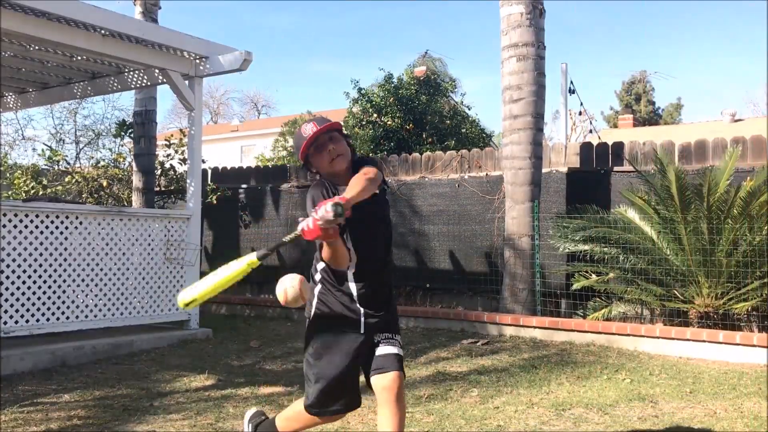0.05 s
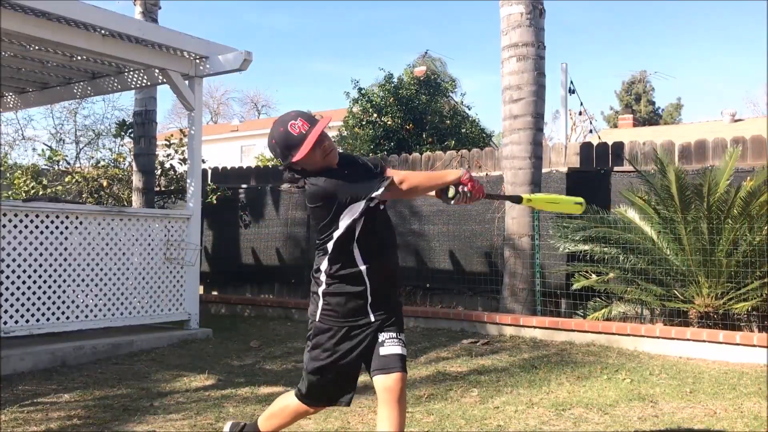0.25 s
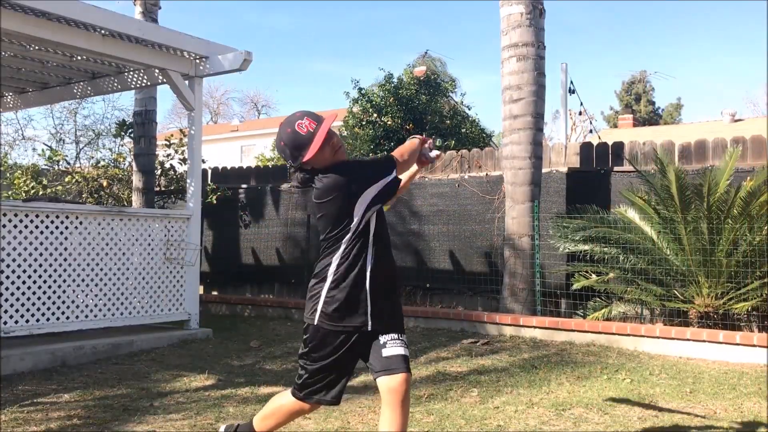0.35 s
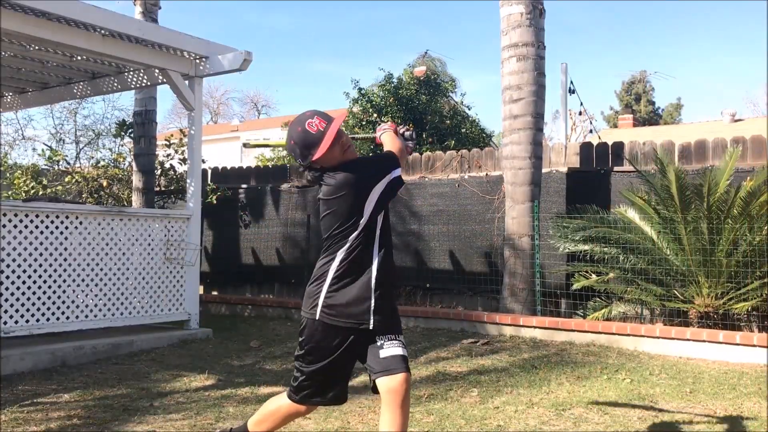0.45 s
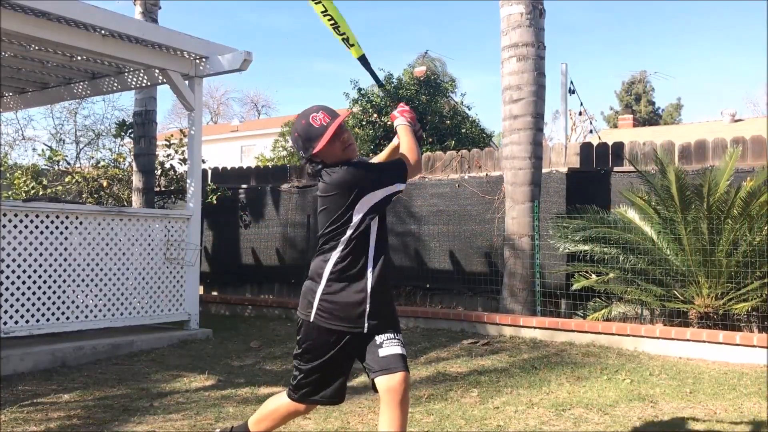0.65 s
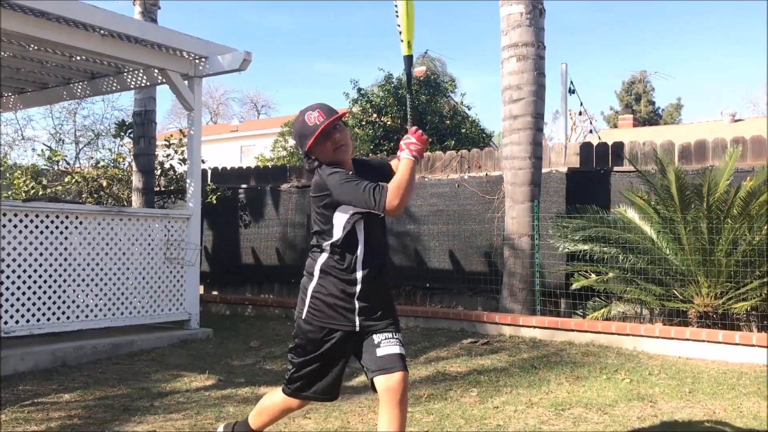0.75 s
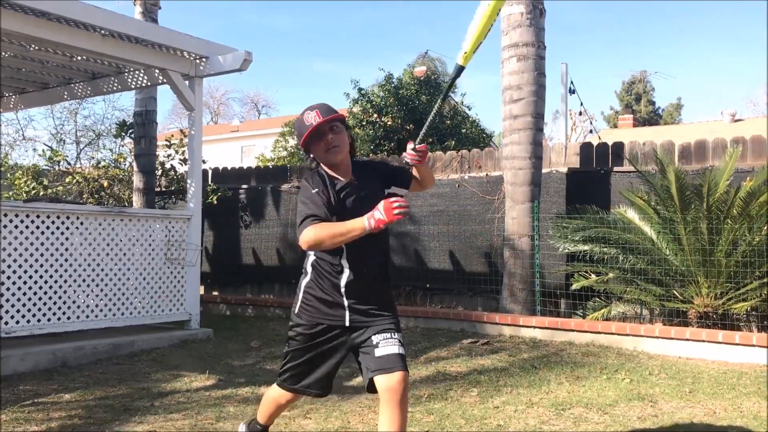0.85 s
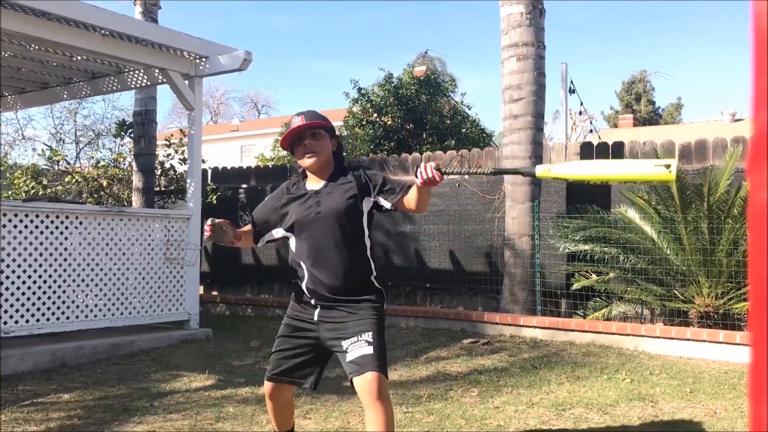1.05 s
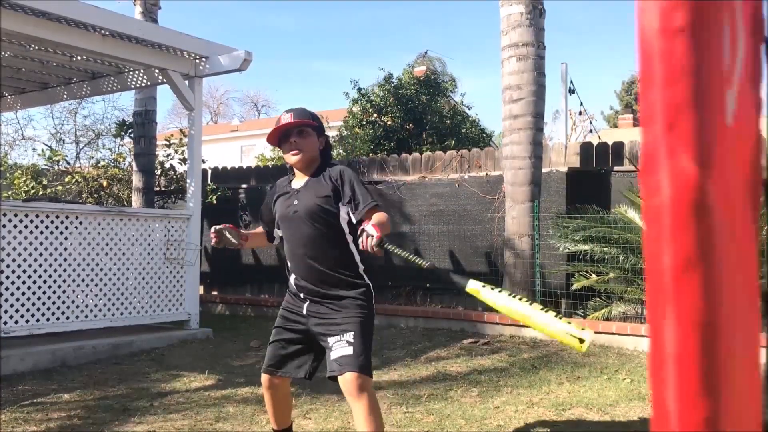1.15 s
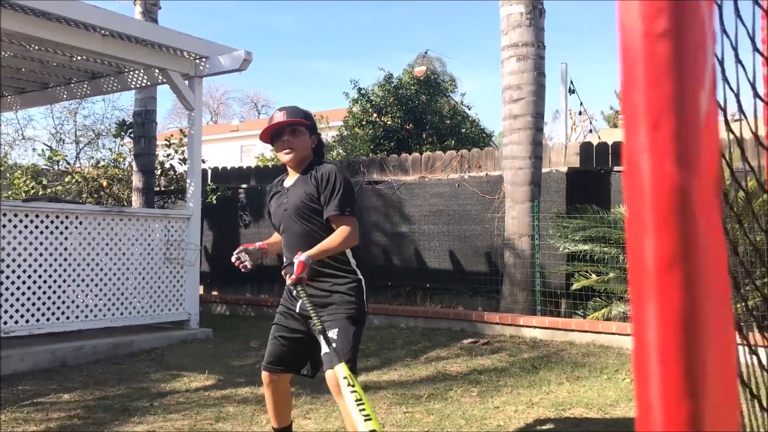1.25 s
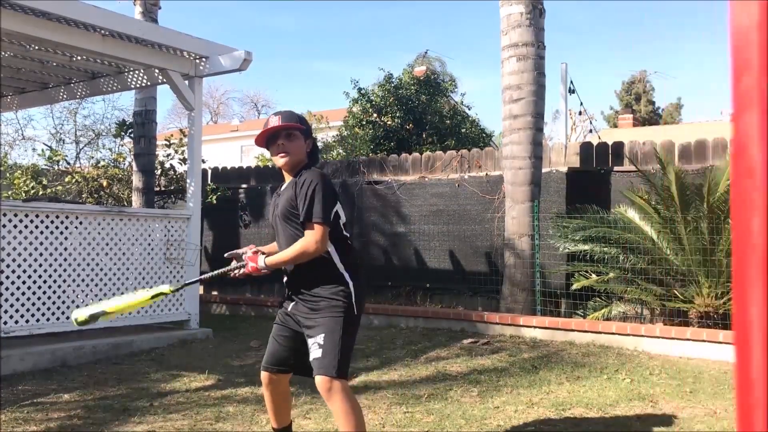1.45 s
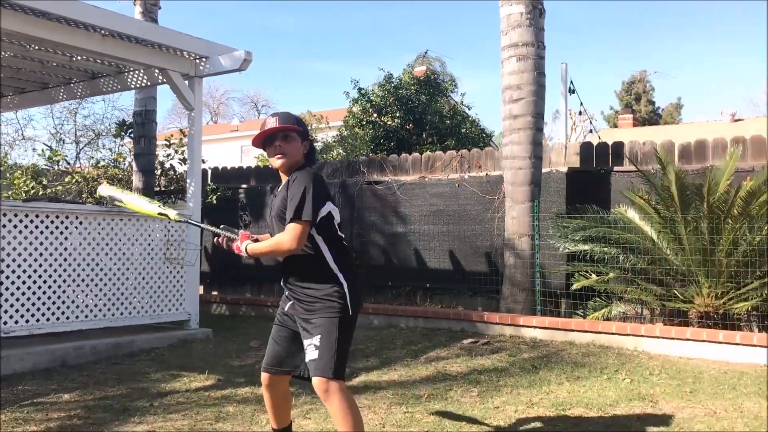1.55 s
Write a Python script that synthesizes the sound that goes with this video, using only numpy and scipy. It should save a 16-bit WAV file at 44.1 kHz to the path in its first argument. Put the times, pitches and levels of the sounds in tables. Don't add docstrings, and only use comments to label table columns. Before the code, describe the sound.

A hollow metal bat cracks a ball at about 0.25 s, loud and dry with a short bright ping. Quick slaps from fences and houses follow until about 0.4 s, with a thin ringing tail fading by 0.7 s. Soft thuds come at 0.7 and 0.8 s, stronger ones at 0.94 to 1.04 s with a low roll. Faint rustles, ticks, distant hum and outdoor hiss remain, with a small click near 1.57 s.

```python
import sys
import numpy as np
from scipy import signal
from scipy.fft import rfft, irfft, next_fast_len
from scipy.io import wavfile
from scipy.ndimage import uniform_filter1d, map_coordinates

SR = 44100
rng = np.random.default_rng(int(sys.argv[2]) if len(sys.argv) > 2 else 0)


def to_wav(s):
    ch = np.atleast_2d(s).T
    pcm = np.round(np.clip(ch, -1, 1) * 32767)
    wavfile.write(sys.argv[1], SR, pcm.astype(np.int16))


def gain_from_db(level_db):
    decades = np.asarray(level_db, float) / 20
    return 10 ** decades


N = 70560


def unit(x):
    return x / np.sqrt(np.mean(x ** 2) + 1e-20)


def along(points, hz):
    f, v = np.transpose(points)
    return np.interp(np.log(hz + 1), np.log(f + 1), v)


def wobble(rate_hz):
    return map_coordinates(rng.standard_normal(400), [np.arange(N) * min(rate_hz, 240) / SR])


def filtered(x, response):
    m = next_fast_len(len(x) + 8192)
    return irfft(rfft(x, m) * response(np.fft.rfftfreq(m, 1 / SR)), m)[:len(x)]


def causal(points):
    cepstrum = irfft(np.log(gain_from_db(along(points, np.fft.rfftfreq(4096, 1 / SR)))))
    cepstrum[1:2048] *= 2
    cepstrum[2049:] = 0
    return irfft(np.exp(rfft(cepstrum)))[:1024]


def patchy(count, patch_db, t60=None):
    hz, t, z = signal.stft(rng.standard_normal(count), SR, nperseg=256)
    field = uniform_filter1d(rng.standard_normal(z.shape), size=4, axis=0)
    field = uniform_filter1d(field, size=6, axis=1)
    fall_db = 0 if t60 is None else -60 * t / np.abs(along(t60, hz))[:, None]
    return signal.istft(z * gain_from_db(patch_db * unit(field) + fall_db), SR, nperseg=256)[1][:count]


def reverberated(x, tail, wet_db):
    return x + gain_from_db(wet_db) * signal.fftconvolve(x, tail / np.linalg.norm(tail))[:N]


def add(track, s, sound):
    part = track[max(round(s * SR), 0):][:len(sound)]
    part += sound[:len(part)]


# (frequency [Hz], level [dB])
CRACK_COLOUR = [(100, -14), (400, -6), (1400, -2), (3000, 0), (5000, -3), (6800, -16), (8800, -10),
                (15000, -21)]


def crack(centre_hz, flat_db, colour):
    t60_s, q, snap = .008, 2.5, 3
    t = np.arange(1024) / SR
    crackle = rng.standard_normal(1024) + snap * (t == 0)
    burst = np.convolve(crackle * gain_from_db(-60 * t / t60_s), colour)
    width_hz = centre_hz / q

    def response(f):
        band = 1j * f * width_hz / (centre_hz ** 2 - f * f + 1j * f * width_hz)
        return gain_from_db(flat_db) + band ** 2

    burst = filtered(burst, response)
    return burst / np.abs(burst).max()


# (frequency [Hz], level [dB], t60 [s])
BARREL_MODES = [(580, 3, 0.0041), (900, -7.5, 0.018), (1015, -9, 0.027), (1690, -16, 0.0093),
                (2010, 0, 0.056), (2148, -12.5, 0.11), (3035, -6, 0.031), (3146, -12, 0.035),
                (3900, -17.5, 0.02), (4820, -25, 0.05), (5270, -38, 0.045)]


def ping():
    attack_s = 0.00025
    t = np.arange(SR // 4) / SR
    ring = 0
    for hz, db, t60 in BARREL_MODES:
        ring = ring + gain_from_db(db + rng.normal(0, 2) - 60 * t / t60) * np.sin(2 * np.pi * hz * t)
    return ring * (1 - np.exp(-t / attack_s))


# (time [s], crack level [dB], ping level [dB], crack centre [Hz], broadband share [dB])
ARRIVALS = [(.2447, -8.5, -54.5, 4400, -3.5), (.2458, -9.5, -24.5, 3090, -13),
            (0.2465, -9, -45.5, 2260, -5.5), (.2482, -22.5, -44, 3120, -26.5),
            (.2503, -29.5, -39, 2800, -7), (.2517, -21.5, -40.5, 2960, -6), (0.2540, -29, -39, 2560, -12.5),
            (0.2646, -21, -41.5, 8400, -7), (.2645, -24.5, -39.5, 3580, -18.5),
            (.2652, -16.5, -16.5, 4400, -10.5), (0.2746, -22.5, -35.5, 5700, -1.5),
            (0.2805, -24.5, -47.5, 1020, -33.5), (0.2927, -25, -45.5, 1090, -35.5),
            (0.3018, -26, -50, 6500, -12), (0.3026, -25, -31, 3970, -10.5), (0.3078, -19, -25.5, 3750, -19),
            (0.3104, -26.5, -34.5, 3000, -25), (.317, -24.5, -35, 3400, -42),
            (.3288, -30.5, -28, 4740, -16.5), (.3590, -36, -32, 2580, -14),
            (.3762, -42.5, -55, 3930, -27.5), (.3902, -41, -55, 3600, -20), (.3995, -32, -46.5, 3920, -30),
            (.492, -45.5, -62, 3860, -25), (.5425, -39, -53, 3380, 3), (.6215, -44, -74, 6000, 5)]


def bat():
    out, colour = np.zeros(N), causal(CRACK_COLOUR)
    for s, crack_db, ping_db, centre_hz, flat_db in ARRIVALS:
        add(out, s, gain_from_db(crack_db) * crack(centre_hz, flat_db, colour))
        add(out, s, gain_from_db(ping_db) * ping())
    return reverberated(out, patchy(SR // 2, 2, [(100, .3)]), wet_db=-15)


# (start [s], frequency [Hz])
HOOP_MODES = [(.257, 2029), (.36, 1996), (.3, 2171), (.343, 2200), (.306, 2190), (.264, 2035),
              (.2645, 4893), (.3275, 4900), (.305, 5280), (.308, 3160), (.4, 3170), (.418, 4900),
              (.2448, 15700), (.2446, 16600), (.2655, 9092), (.2642, 12800), (.468, 2165), (.52, 2170),
              (.58, 2020), (.67, 2170)]
# (level [dB], t60 [s], swell [s])
HOOP_ENVELOPES = [(-30, 0.42, .006), (-51, 0.83, 0.033), (-44.5, 0.45, 0.012), (-26.5, 0.098, 0.0024),
                  (-28.5, 0.071, .002), (-20.5, .1, .002), (-23.5, 0.026, 0.00073), (-34.5, 0.037, 0.0027),
                  (-49.5, 0.21, 0.008), (-33.5, 0.096, 0.0023), (-45, 0.05, 0.0026), (-54, 0.067, 0.0036),
                  (-30.5, .012, .0005), (-16.5, .008, 0.00036), (-37.5, 0.031, 0.0031), (-40, .008, .0005),
                  (-41.5, 0.2, 0.0066), (-42.5, 0.21, 0.0053), (-56, 0.26, .014), (-54, 0.14, 0.012)]


def hoop():
    out, t = np.zeros(N), np.arange(SR) / SR
    for (s, hz), (db, t60, swell) in zip(HOOP_MODES, HOOP_ENVELOPES):
        waver = gain_from_db(5 * np.tanh(wobble(70)[:SR]))
        tone = np.sin(2 * np.pi * hz * t + .7 * wobble(50)[:SR])
        envelope = gain_from_db(db - 60 * t / t60) * (1 - np.exp(-(t / swell) ** 2))
        add(out, s, envelope * waver * tone)
    return out


# (frequency [Hz], t60 [s])
YARD_T60 = [(150, 0.7), (500, 0.3), (1200, 0.53), (2100, 0.6), (4000, 0.75), (8000, 1), (15000, 1)]
# (frequency [Hz], level [dB])
YARD_COLOUR = [(150, 10), (450, 16.5), (1000, 16.5), (1550, 11), (2150, 17.5), (3200, 8), (5200, -5.5),
               (7500, -18)]


def yard():
    build_s, patch_db, level_db = 0.019, 2, -34
    out, t = np.zeros(N), np.arange(SR) / SR
    tail = filtered(patchy(SR, patch_db, YARD_T60), lambda f: gain_from_db(along(YARD_COLOUR, f)))
    tail = tail / tail[:SR // 10].std()
    add(out, ARRIVALS[0][0], gain_from_db(level_db) * tail * (1 - np.exp(-(t / build_s) ** 2)))
    return out


# (time [s], peak level [dB], pitch
# [Hz], length [cycles], pitch drop [1/cycle])
THUDS = [(0.075, -41.5, 150, 0.71, 0.02), (0.233, -40, 225, 1.5, 0.021), (.245, -12, 516, 2.03, 0),
         (0.2449, -26.5, 186, 1.5, 0), (.2465, -14.5, 742, 2.87, 0.01), (.2472, -28.5, 836, 2.5, 0.035),
         (0.2467, -21.5, 1230, 5.3, 0.016), (0.247, -29, 1720, 3.4, 0.014), (0.301, -42, 192, 2.8, 0.016),
         (0.367, -41.5, 163, 1.55, 0.025), (.543, -44.5, 348, 2.4, 0), (0.711, -36, 153, 1.5, 0.031),
         (0.7919, -42, 1370, 2.9, 0.0098), (.794, -36, 344, 1.72, 0.011), (0.802, -48, 424, 6.1, 0.0097),
         (.880, -41.5, 132.5, 2, 0.0025), (.938, -47.5, 660, 3.1, 0.0089), (0.9394, -28, 261, 2, 0),
         (0.9442, -25, 127, 1.35, 0.02), (0.974, -41.5, 103.5, 1.17, 0.013), (1.0044, -34, 203, 4.6, 0.025),
         (1.036, -44, 112, 3, 0.017)]


def thuds():
    out = np.zeros(N)
    for s, db, hz, cycles, sag in THUDS:
        u = np.arange(int(3 * cycles / hz * SR)) / SR * hz
        shape = (u / cycles) ** 1.28 * np.exp(-(1.62 * u / cycles) ** 2)
        add(out, s, gain_from_db(db) * shape / shape.max() * np.sin(2 * np.pi * (u - sag * u * u / 2)))
    return out


# (time [s], peak level [dB], pitch [Hz], length [cycles])
TICKS = [(.045, -47, 1300, 5), (.0635, -46, 5000, 2), (.130, -57, 5000, 2), (.222, -51, 4000, 2),
         (.9345, -52, 5000, 5), (.9375, -43, 3700, 3), (.9383, -46, 6000, 3), (.9388, -52, 14000, 5),
         (.9525, -54, 3500, 3), (.9575, -51, 3200, 2), (.678, -50, 2200, 2), (1.0095, -52, 4000, 2),
         (1.017, -50, 2000, 2), (1.03, -52, 2500, 2), (1.038, -52, 3500, 2), (1.05, -47, 2400, 4),
         (1.0525, -49, 3000, 3), (1.04, -60, 8600, 40), (1.047, -58, 8600, 50), (1.056, -50, 2800, 3),
         (1.108, -55, 4000, 2), (1.312, -55, 6000, 1), (1.378, -56, 7000, 1.5), (1.399, -54, 3300, 2),
         (1.545, -62, 3000, 20), (1.5668, -41, 2900, 1.3), (1.5669, -48, 5800, 2.5)]


def ticks():
    out = np.zeros(N)
    for s, db, hz, cycles in TICKS:
        u = np.arange(int(5 * cycles / hz * SR)) / SR * hz
        grit = 0.23 * rng.standard_normal(2000)[:len(u)]
        add(out, s, gain_from_db(db) * np.exp(-1.5 * u / cycles) * (np.sin(2 * np.pi * u) + grit))
    return out


def lawn(x):
    return reverberated(x, patchy(SR // 2, 4.3, [(100, .3)]), wet_db=-14)


# (time [s], level [dB rms], t60 [s])
ROLLS = [
    (0.792, -62.5, 0.19),
    (0.946, -49, 0.78),
    (1.01, -43.5, 0.25),
]
# (frequency [Hz], level [dB])
ROLL_COLOUR = [(100, -31), (200, 10.5), (420, -0.5), (520, -15), (1000, -29.5)]


def roll():
    attack_s = 0.0071
    out, t = np.zeros(N), np.arange(SR // 2) / SR
    for s, db, t60 in ROLLS:
        noise = unit(filtered(rng.standard_normal(len(t)), lambda f: gain_from_db(along(ROLL_COLOUR, f))))
        add(out, s, gain_from_db(db - 60 * t / t60) * (1 - np.exp(-t / attack_s)) * noise)
    return out


# (start [s], length [s], level [dB], tilt [dB/octave])
RUSTLES = [(.008, 0.078, -60.5, -7.5), (0.132, 0.054, -65, -9.5), (0.202, 0.066, -55.5, -9),
           (0.413, 0.27, -63.5, -5.5), (0.669, 0.046, -63.5, -5), (0.78, 0.059, -61, -9),
           (0.85, 0.037, -67.5, -4.5), (0.936, 0.0098, -56, -8.5), (1.007, 0.022, -57.5, -7),
           (1.031, 0.043, -59, -7.5), (1.085, 0.027, -66.5, -4), (1.202, 0.14, -68.5, -1),
           (1.251, 0.23, -62.5, -9), (1.521, 0.088, -69.5, -9.5)]


def rustle():
    grain_db, low_cut_hz = 2.5, 1100
    out, t = np.zeros(N), np.arange(SR // 2) / SR
    for s, length, db, tilt_db in RUSTLES:
        def response(f):
            tilt = gain_from_db(tilt_db * np.log2(f / 3000 + 0.042))
            return tilt * f * f / (f * f + low_cut_hz ** 2)

        noise = unit(filtered(rng.standard_normal(len(t)), response))
        swell = np.sin(np.pi * np.clip(t / length, 0, 1)) ** 0.54
        add(out, s, gain_from_db(db + grain_db * np.tanh(wobble(220)[:len(t)])) * swell * noise)
    return out


# (start [s], end [s], frequency [Hz], level [dB rms])
WHINE = (.63, 1.29, 406, -70.5)


def whine():
    fade_s = 0.052
    t, (start, end, hz, db) = np.arange(N) / SR, WHINE
    gate = np.clip(np.minimum(t - start, end - t) / fade_s, 0, 1)
    tone = np.sin(2 * np.pi * hz * t + .4 * wobble(14))
    return np.sqrt(2) * gain_from_db(db + 1.5 * wobble(14)) * gate * tone


# (frequency [Hz], level [dB rms])
HUM_LINES = [(74.5, -57.5), (134.6, -61.5), (224, -76.5), (270, -71.5)]


def hum():
    wander_db, wander_hz = 1, 1.74
    out, t = np.zeros(N), np.arange(N) / SR
    for hz, db in HUM_LINES:
        level = np.sqrt(2) * gain_from_db(db + wander_db * wobble(11.0))
        out += level * np.sin(2 * np.pi * np.cumsum(hz + wander_hz * wobble(7.2)) / SR)
    return out * (1 - np.exp(-t / .05))


# (frequency [Hz], density [dB/Hz])
AIR_COLOUR = [(25, -9.5), (89, -6.5), (223, -16), (510, -25.5), (950, -24), (2760, -32.5), (14000, -43.5),
              (16000, -45.5)]


def air():
    level_db, patch_db, sway_db = -58.5, 2, 0.5
    hiss = unit(filtered(patchy(N, patch_db), lambda f: gain_from_db(along(AIR_COLOUR, f))))
    return gain_from_db(level_db + sway_db * np.tanh(wobble(25.76))) * hiss


def scene():
    blow = bat() + hoop() + yard()
    ground = lawn(thuds() + ticks()) + roll()
    return (blow + ground + rustle() + whine() + hum() + air())[None]


def microphone(x):
    bass_cut_hz, top_hz, over_top_db, end_hz = 42, 15900, -20, 17130

    def response(f):
        shelf = gain_from_db(over_top_db * np.clip((f - top_hz) / 300, 0, 1) ** 2)
        return shelf * (f < end_hz) * f * f / (f * f + bass_cut_hz ** 2)

    return filtered(x, response)


# (centre [s], above [Hz], level [dB], highest spared line [Hz])
TREBLE_DIPS = [
    (.452, 4000, -22, 5000),
    (.985, 1800, -22, 7000),
    (1.049, 5200, -20, 9000),
    (1.455, 3000, -11, 7000),
    (1.52, 2000, -13, 6000),
]
SPARED_HZ = np.array([2800, 3600, 4900, 5600, 6700, 8600])


def treble_dips(x):
    dip_s, line_width_hz, line_db = .009, 130, 5
    t = np.arange(N) / SR
    for s, hz, db, spared_hz in TREBLE_DIPS:
        def response(f):
            centres = SPARED_HZ[SPARED_HZ < spared_hz]
            lines = sum(np.exp(-((f - c) / line_width_hz) ** 2) for c in centres)
            return (1 - gain_from_db(line_db) * lines) / (1 + (hz / (f + 1)) ** 10)

        x = x - (1 - gain_from_db(db)) * np.exp(-((t - s) / dip_s) ** 2) * filtered(x, response)
    return x


def top_cut(x):
    return signal.sosfilt(signal.butter(12, 17130, fs=SR, output="sos"), x)


def record(dry):
    ceiling = .5
    x = treble_dips(microphone(dry[0]))
    x = x / (1 + np.abs(x / ceiling) ** 6) ** (1 / 6)
    return top_cut(x[None])


dry = scene()
out = record(dry)
to_wav(out)
```